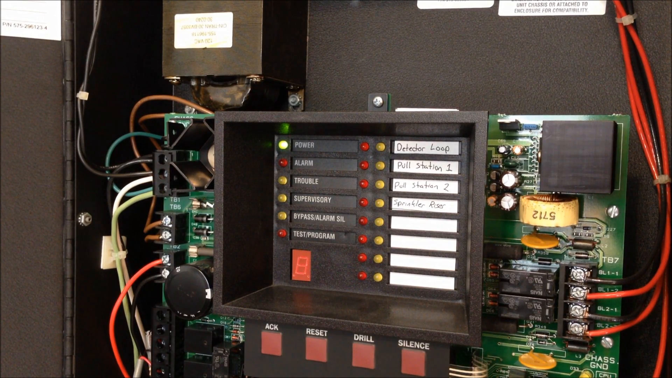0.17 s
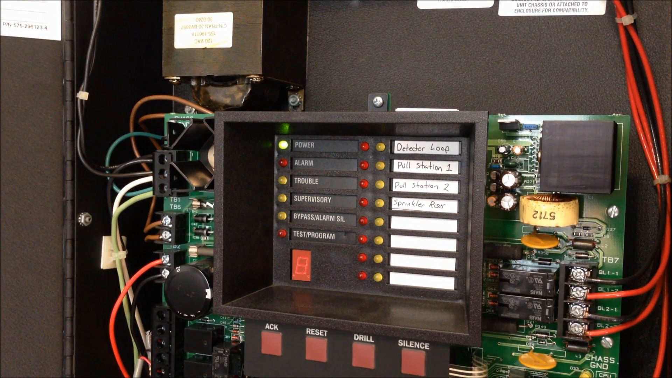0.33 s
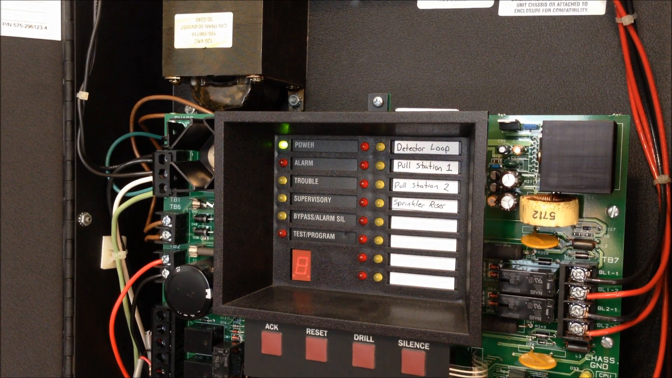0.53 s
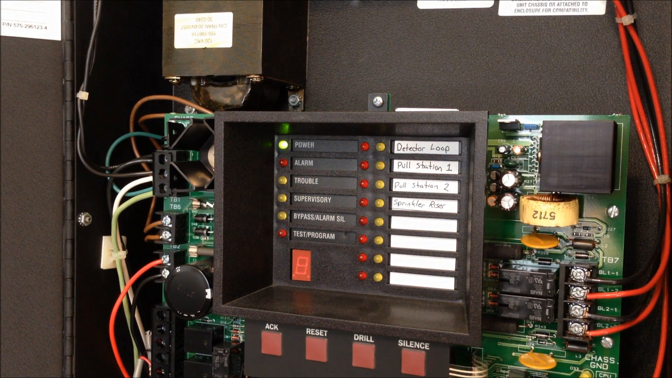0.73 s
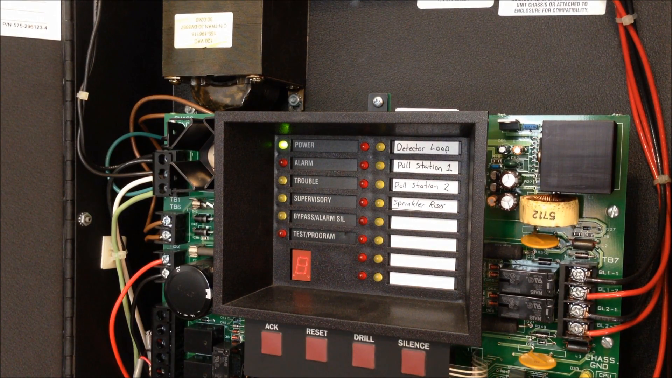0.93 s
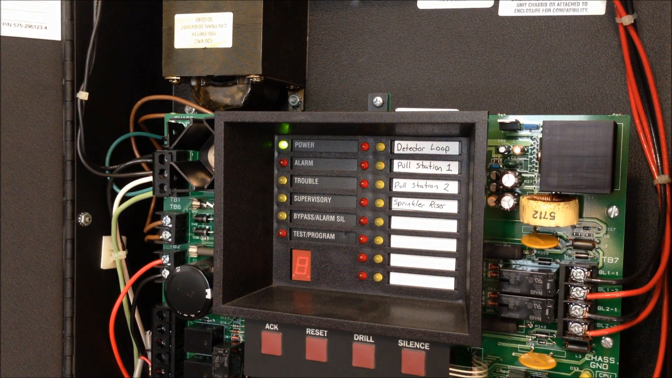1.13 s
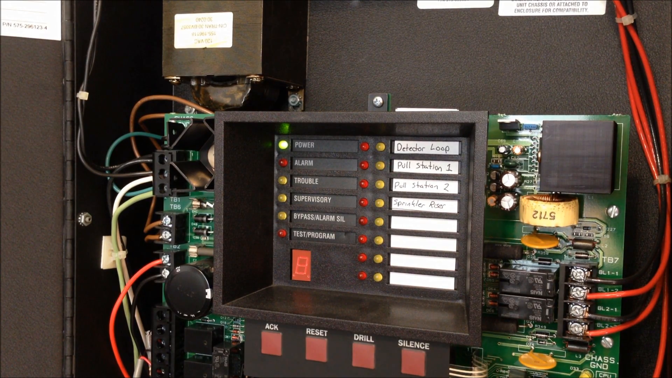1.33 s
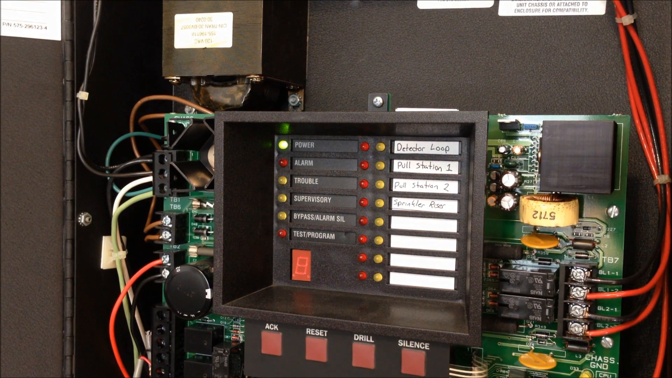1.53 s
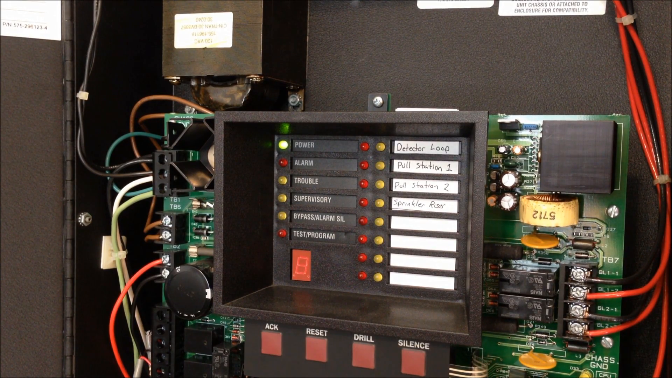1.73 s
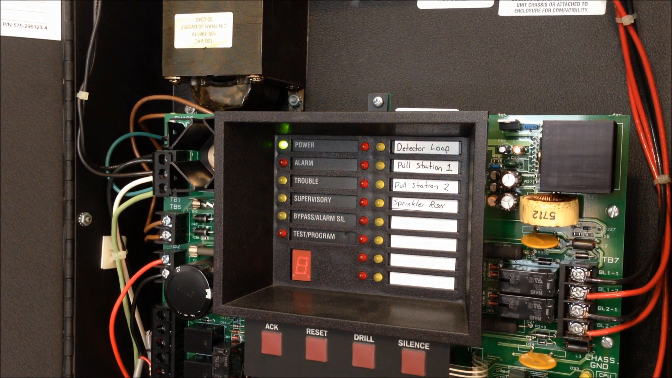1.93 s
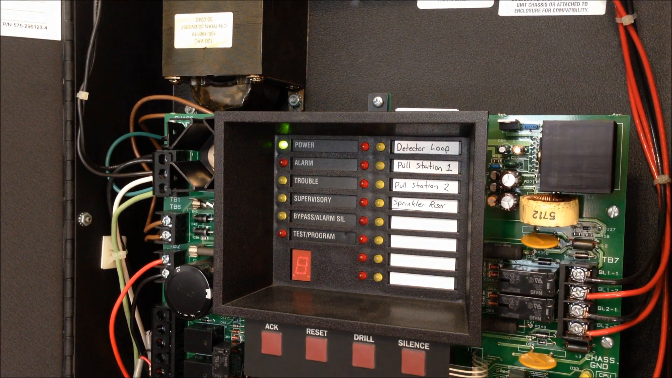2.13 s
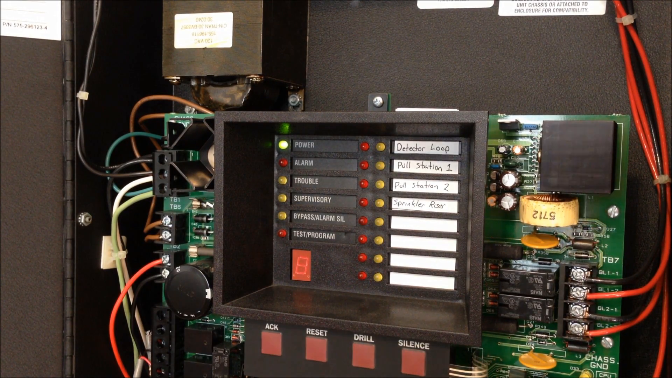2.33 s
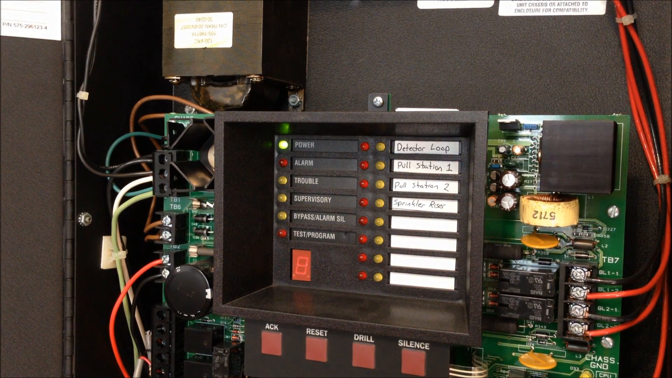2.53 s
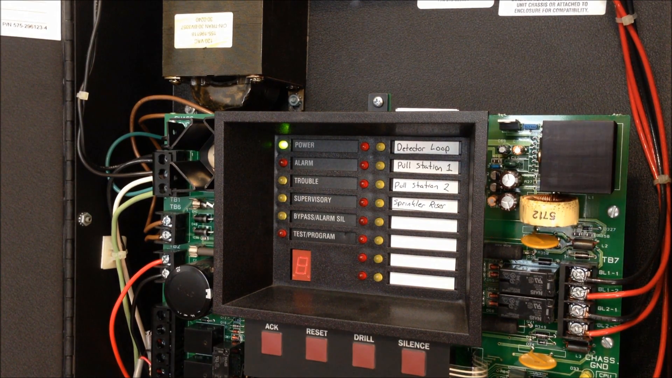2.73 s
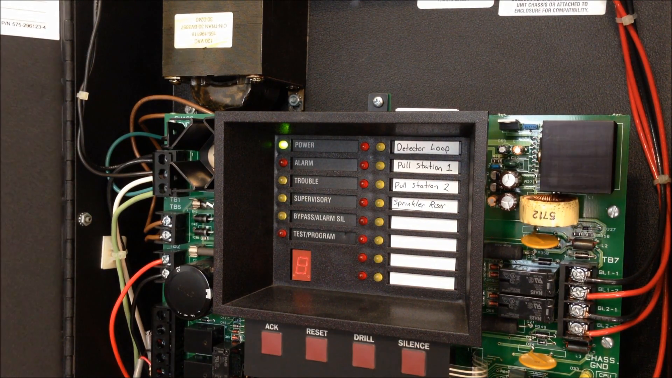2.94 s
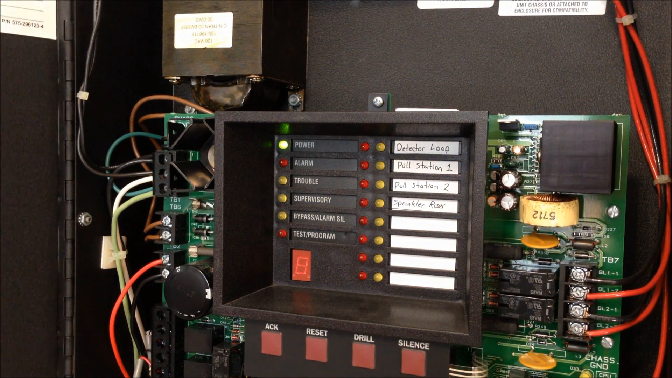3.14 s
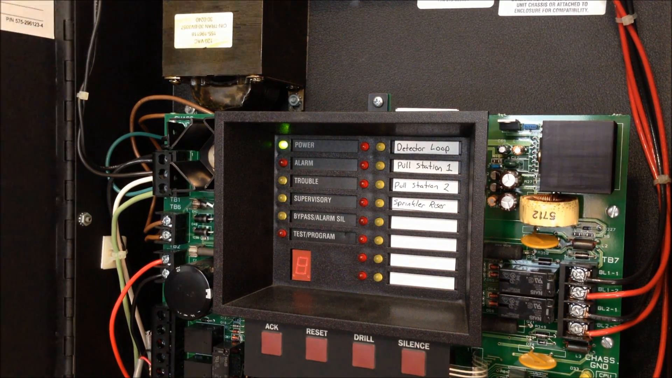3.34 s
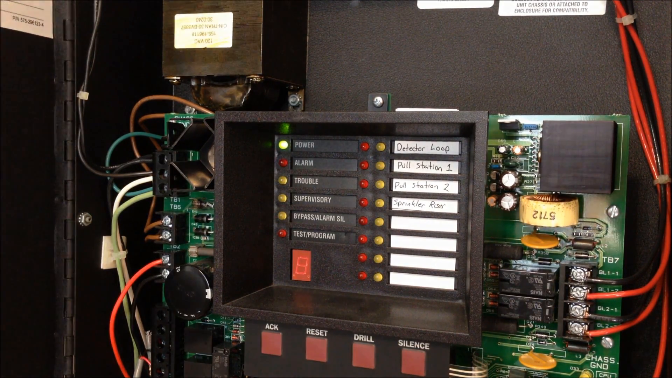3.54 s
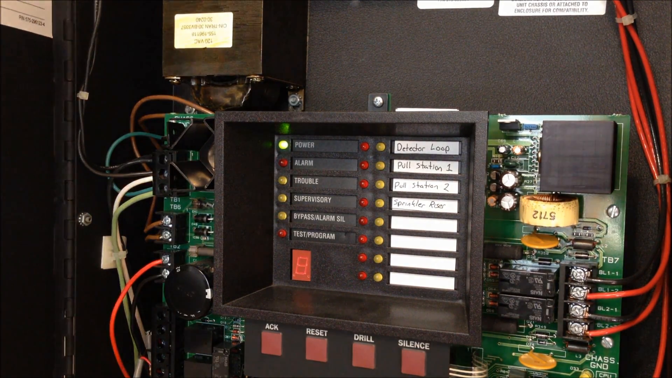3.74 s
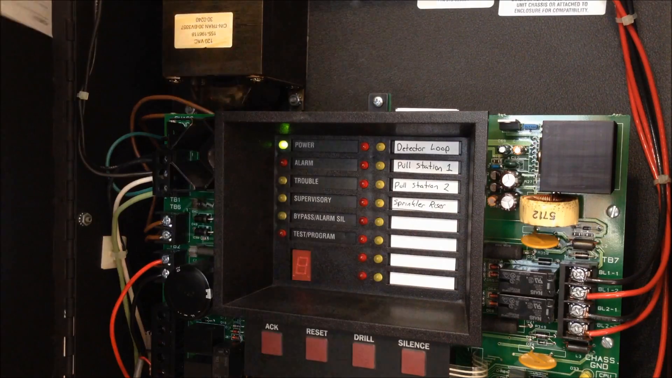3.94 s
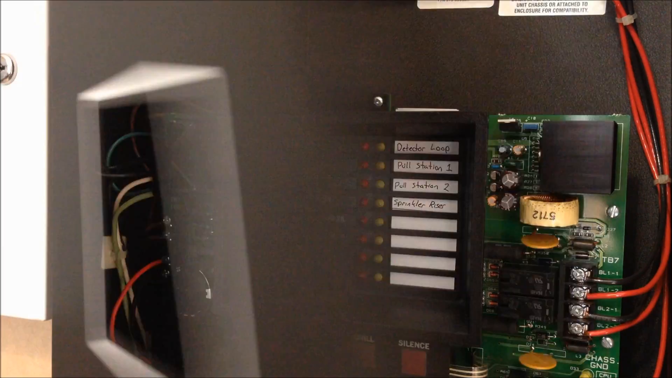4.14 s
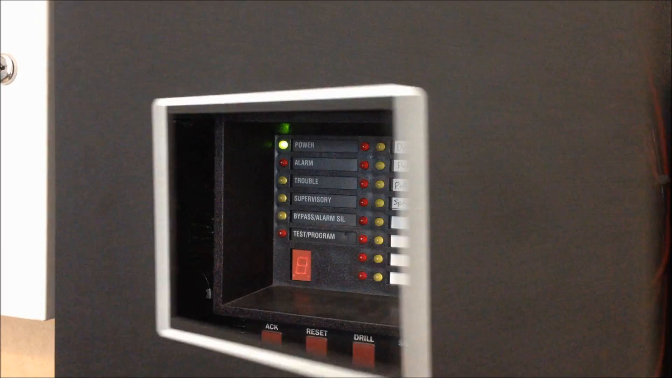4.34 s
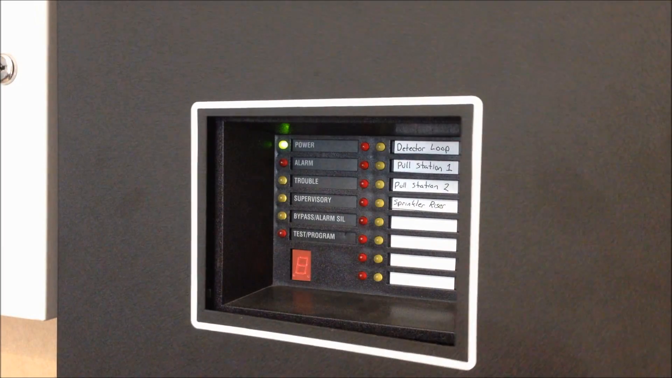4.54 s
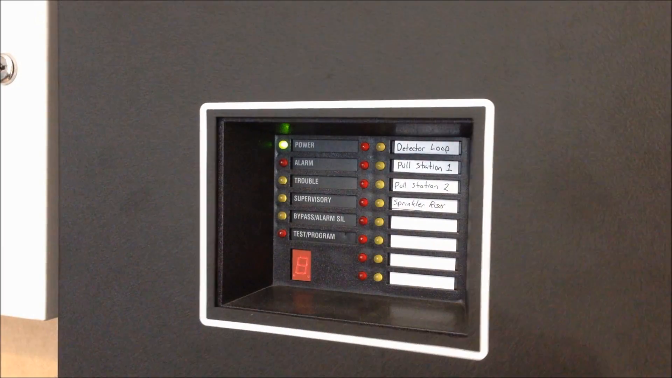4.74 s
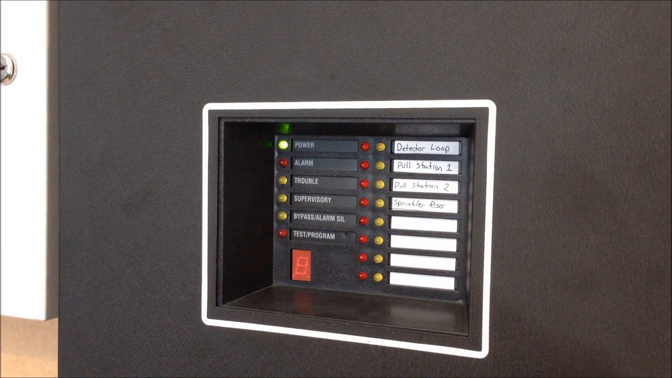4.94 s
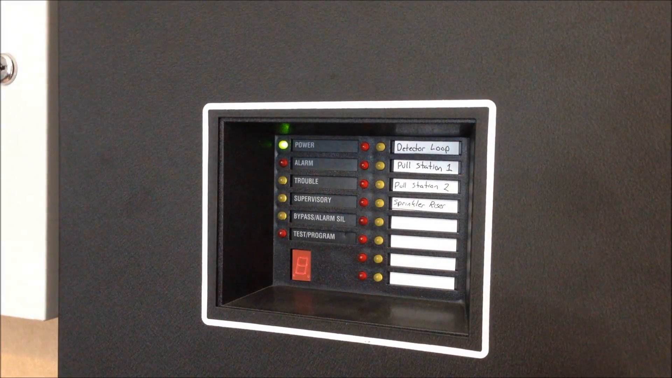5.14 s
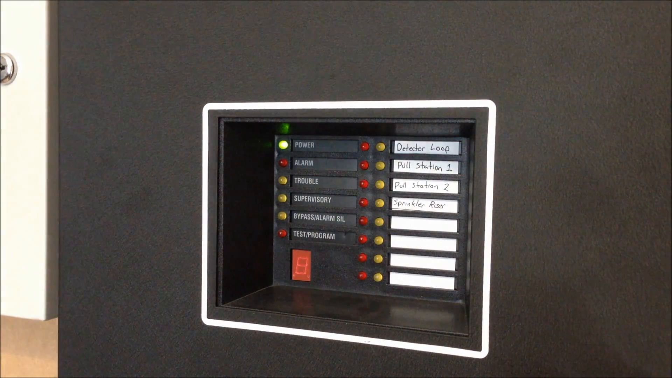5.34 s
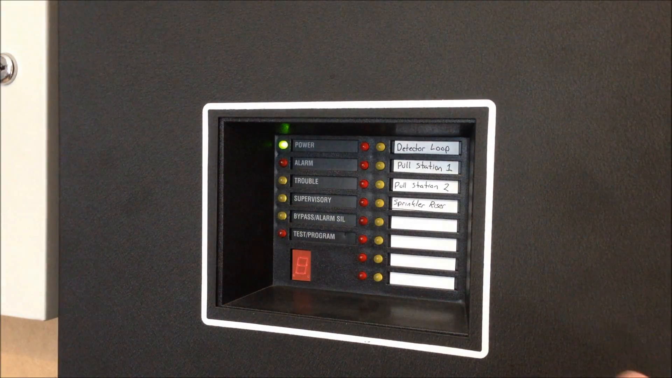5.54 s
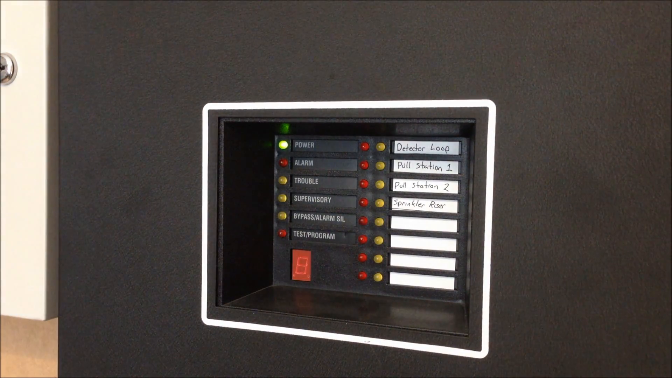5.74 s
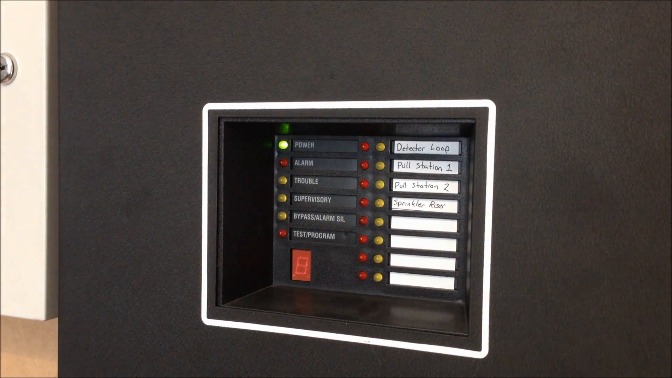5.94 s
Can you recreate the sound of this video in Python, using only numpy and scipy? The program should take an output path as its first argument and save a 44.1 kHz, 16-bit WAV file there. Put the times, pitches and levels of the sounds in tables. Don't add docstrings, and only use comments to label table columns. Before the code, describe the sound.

Close microphone at a steel cabinet in a quiet room with faint hiss and low rumble. Two crisp latch clicks come early, then a long near-silence. The latch snaps again, a finger taps, a hand knocks the panel and small keys jingle faintly. The thin door bangs shut hard with a short boom, then rattles, bounces softly and settles.

```python
import sys
import numpy as np
from scipy import signal
from scipy.io import wavfile

SR = 44100
rng = np.random.default_rng(int(sys.argv[2]) if len(sys.argv) > 2 else 0)


def int16_out(signal):
    q = np.round(np.clip(np.atleast_2d(signal).T, -1, 1) * 32767)
    wavfile.write(sys.argv[1], SR, q.astype(np.int16))


def how_loud(loudness_db):
    steps = np.asarray(loudness_db, float) / 20
    return 10 ** steps


N = 267995

EDGES = np.append(28 * 2 ** np.arange(0, 9.1, 1 / 3), 17000)
CENTRES = np.sqrt(EDGES[1:] * EDGES[:-1])

# pitch_hz, level_db (per Hz)
ROOM_AIR = [(25, -20.5), (50, -8), (90, -5.5), (150, 0.5), (220, -8), (350, -9.5), (450, -16.5), (700, -21),
            (1300, -26.5), (2200, -24.5), (3800, -21), (6000, -22.5), (10000, -23), (15800, -24.5)]
# pitch_hz, level_db
HUM = [(240.4, -80.5), (359, -82), (116, -91.5)]
# nearest_s, level_db, away_s (to move one nearest-distance), pitch_hz
PASSES = [
    (1.805, -60, 0.28, 112.6),
    (2.2, -76.5, .12, 110),
    (1.1, -75.5, .4, 83),
    (3, -70.5, 0.256, 76),
    (5.2, -73.5, 0.58, 80),
]
# centre_s, level_db
THUDS = [(.88, -70), (1.82, -62), (1.96, -65.5), (3.27, -72), (3.63, -62.5), (5.78, -60)]

# start_s, level_db (peak), weight_db, sharpness_db, t60_s
LATCH_CLICK = [(1.1463, -29.5, -15, -22, 0.17)]
LATCH_CATCH = [(1.2147, -25.5, -18, -26, 0.14)]
LATCH_RELEASE = [(3.0348, -27.5, 0, 0, 0.14)]
CREEPS = [
    (3.348, -43, -1, -1, 0.1),
    (3.722, -45.5, 0.5, -22, 0.14),
    (5.09, -49, -8, 3, 0.13),
    (5.102, -42, -12, -3, .1),
]
FINGER_TAP = [
    (3.3997, -46, -18, -5, 0.083),
    (3.4032, -33.5, -26.5, -35, 0.18),
]
RUBS = [
    (3.733, -39.5, 2.5, -31.5, 0.085),
    (4.928, -33.5, 2, -32.5, 0.047),
    (5.101, -32, -9, -25.5, 0.1),
]
HANDLING = [
    (3.7394, -22.5, -10, -11.5, 0.091),
    (3.7644, -39, -11.5, -13, 0.22),
    (4.0134, -55.5, -3.5, -21, 0.3),
    (4.6394, -69.5, 0.5, -26, 0.26),
]
KEY_RATTLE = [(3.8035, -47, -16.5, 6, 0.2), (4.1038, -56, -14.5, -1, 0.22), (4.1435, -56.5, -18, 8, 0.089),
              (4.1571, -61, -13, 10, 0.42), (4.195, -57.5, -22, -19, 0.3), (4.2385, -42.5, -28, 0, 0.25),
              (4.2505, -40.5, -21.5, -20, 0.14), (4.352, -56, -23, -8, 0.11)]
KEY_SWING = [(3.8675, -39.5, -26, -1, 0.15)]
SLAM = [
    (4.9349, -11.5, -12.5, -29.5, 0.069),
    (4.9417, -7.5, -21, -16, 0.17),
    (4.9464, -12.5, -11.5, -17.5, 0.13),
    (4.9754, -16, -14.5, -16.5, 0.21),
]
FRAME_RATTLE = [(5.1067, -31, -7.5, -6.5, 0.11), (5.1134, -28, -16, -14, 0.089),
                (5.1263, -44.5, -7.5, -14, 0.55)]
FRAME_TICK = [(5.2555, -45.5, 0, 0, 0.11)]
REBOUND = [
    (5.2754, -38, -2, -16, 0.081),
    (5.281, -42.5, -1.8, -27, 0.12),
    (5.2966, -50.5, -1.3, -32, 0.21),
]
LOCK_RATTLE = [(5.3852, -51.5, -10.5, -21, 0.39), (5.4301, -72, -8, -2, 0.13),
               (5.4622, -39.5, -17, -13, 0.17)]
SETTLING = [(5.713, -43, -3.5, -33, 0.16), (5.782, -77, 5, -6, 0.11), (5.88, -66, -0.5, -5, 0.11),
            (5.93, -74, -6, -7.5, 0.13)]

# pitch_hz, level_db, t60_s
LATCH_MODES = [(642, -8.5, 0.094), (780, -27, 0.11), (1080, -8, 0.087), (1160, -25, 0.38),
               (1335, -2.5, 0.14), (1695, -4.5, 0.12), (2090, -12, 0.069), (2890, -11, 0.16),
               (3520, 3, 0.04), (3800, -15, 0.039), (4470, -18, .09), (4880, 1, 0.057), (4700, -8, 0.042),
               (5100, 3.5, 0.034), (7600, -16, 0.05), (9140, -18, 0.059), (15800, 8, 0.02)]
CATCH_MODES = [(644, -17, 0.16), (1078, -3.5, 0.13), (1200, -14.5, 0.3), (1330, -2, 0.12),
               (1650, -5.5, 0.12), (2090, 2, 0.054), (2920, -13, 0.035), (3307, 9, 0.023), (3470, 4, 0.025),
               (3940, -14, 0.16), (4130, -15, 0.14), (5100, -14, 0.08), (4570, 0, 0.048), (5320, 8, 0.03),
               (6500, -9, 0.025), (7230, 8, 0.014), (7640, -15, 0.18), (7500, -9, 0.19), (16150, 0, .02)]
RELEASE_MODES = [(654, -10.5, 0.098), (1210, -23, 0.4), (1333, -8.5, 0.06), (1465, -5, 0.13),
                 (1696, -7, 0.092), (2100, -27, .08), (3410, 1.5, 0.044), (3600, -8, 0.085),
                 (4440, -21, 0.079), (4820, 5, 0.043), (5070, 9, 0.03), (5440, 2, 0.044), (13700, -10, .03),
                 (16010, 3, .015)]
TAP_MODES = [(505, -15.5, 0.31), (631, -16.5, 0.42), (1766, 3, 0.049), (2070, 1, 0.05), (2650, -2, 0.04),
             (3180, -6, 0.05), (4160, -6, 0.076), (4400, -6, 0.068), (5230, 6.5, 0.045), (6570, -13, .07)]
PANEL_MODES = [(158.6, -8, 0.2), (360, 3, 0.13), (440, -27, .1), (622, 0, 0.21), (950, -4, 0.19),
               (1142, -8, 0.26), (1560, -0.5, 0.18), (3450, -4.5, 0.054), (4600, 5, 0.027), (5470, -30, .1),
               (6100, -20, 0.091), (6900, -25, 0.053), (7300, 9.5, 0.017), (8400, -1, 0.012)]
KEY_MODES = [(1558, -12.5, 0.055), (4100, -10.5, 0.03), (4570, -8, .03), (5420, -2, 0.035),
             (6275, -3.5, 0.03), (6850, -4.5, .03), (8400, -8, 0.027), (9900, -10, .03), (12500, -16, .025),
             (14800, -10, .025)]
SWING_MODES = [(1620, -28, .06), (4800, -21, .04), (6020, 6, .06), (6250, -6, .05), (8040, 5, .025),
               (7500, -2, .03)]
DOOR_MODES = [(1172, -14.5, 0.2), (1260, -13.5, 0.16), (1430, -19.5, 0.52), (1644, -12, 0.35),
              (1890, -8.5, 0.27), (2250, -14.5, 0.15), (2440, -12.5, 0.18), (2823, -8, .15),
              (3400, -7.5, .12), (3910, -9, .13), (3730, -8, .1), (3524, -10.5, 0.1), (3750, -7.5, 0.13),
              (5235, -4.5, 0.11), (5700, -2.5, 0.082), (6400, -14.5, 0.083), (6450, -15.5, .15)]
FRAME_MODES = [(962, -11.5, 0.13), (6380, -18, .1), (9900, -15, 0.073), (14760, -6, .05)]
LOCK_MODES = [(5400, -18, .08), (6234, -11, 0.13), (7430, -2, 0.08), (8220, -7, 0.076), (9800, -27, .11),
              (11200, -21, .08), (12430, -8, .06), (13640, -17, 0.06), (14380, -5, 0.09),
              (14550, -5, 0.076)]
REBOUND_MODES = [(674, -7, 0.051), (1260, -12, 0.08), (1950, -26, 0.07), (1666, -14, 0.18),
                 (2120, -20, 0.063), (2316, -27, 0.099), (3460, -30, 0.11)]
SETTLING_MODES = [(70.5, -4, 0.26), (200.2, 2.5, 0.14), (315, -12, 0.27), (378, -11.5, 0.78),
                  (460, -5, 0.206), (846, -14, 0.13), (1125, -23.5, .15), (2990, -18, 0.046)]

# pitch_hz, level_db (per Hz)
LATCH_COLOUR = [(180, -42), (300, -35), (446, -28), (631, -14.5), (849, -14), (1090, -2.5), (1670, -9.5),
                (1970, -7), (2610, -16), (4000, -3.5), (11100, -16.5), (13600, -11), (15500, -24)]
RELEASE_COLOUR = [(300, -34), (631, -16.5), (1100, -8), (1600, -3.5), (2100, -9.5), (2700, -31),
                  (3500, -4.5), (5300, -3), (7500, -11), (13600, -11), (15500, -26)]
KEY_COLOUR = [(59, -16.5), (100, -5.5), (640, -1.5), (758, -15.5), (936, -5.5), (1520, -4), (2690, -4),
              (6260, 3), (13700, -12.5), (14500, -16), (15500, -27)]
PANEL_COLOUR = [(60, -22), (150, -3.5), (400, -7), (1000, -1.5), (2500, -2.5), (4500, -2.5), (7500, -2),
                (10000, -9.5), (12000, -24), (15500, -26)]
SWING_COLOUR = [(200, -11), (1000, -10.5), (2500, -10.5), (6000, -1.5), (8500, -3), (12000, -18),
                (15500, -18)]
DOOR_COLOUR = [(30, -41.5), (70, -18), (200, -8), (500, -18.5), (1200, -14), (3000, -17.5), (6300, -17),
               (9000, -29.5), (15500, -43)]
LOCK_COLOUR = [(59, -37.5), (100, -6.5), (362, -9.5), (808, -15.5), (936, -12), (1880, -17), (2090, -18),
               (6000, -11.5), (15500, -13)]
TICK_COLOUR = [(300, -18), (1500, -15), (4000, -13), (9000, -16), (12000, -20), (15000, -10)]

# pitch_hz, factor
RING_LENGTH = [(60, 2.8), (250, 1.9), (1200, 1.24), (4500, 0.95), (12000, 0.74)]
# start_s, pitch_hz, level_db, t60_s
BOOM_MODES = [(4.927, 151, -34, 0.14), (4.934, 438.5, -20.5, 0.13), (4.938, 196, -15.5, 0.066),
              (4.945, 208.1, -21, 0.25), (4.942, 636, -21, 0.067), (4.94, 298, -22.5, 0.17),
              (4.94, 128, -40.5, .15), (4.94, 54.6, -36, .3), (4.942, 823, -24, 0.1),
              (4.942, 913, -32.5, 0.24), (4.975, 390.7, -31.5, 0.23), (4.985, 460, -32, 0.22),
              (5.003, 224.3, -32, 0.31), (5.005, 111.5, -30.5, 0.16), (5.045, 244.5, -37.5, 0.44),
              (5.061, 149, -40, 0.39), (5.1, 343, -39.5, 0.216), (5.105, 567, -48, 0.17),
              (5.115, 680, -48, 0.17), (5.263, 196.7, -38, 0.26), (5.275, 374, -36.5, 0.07),
              (5.28, 450, -45.5, 0.12), (5.285, 136, -41.5, 0.19), (5.29, 218, -35, 0.071),
              (5.286, 1668, -46, 0.12), (5.3, 1680, -60, 0.22)]


def rms_one(x):
    return x / np.sqrt(np.mean(x ** 2) + 1e-20)


def at_hz(points, hz):
    table_hz, values = np.array(points).T
    return np.interp(np.log(hz), np.log(table_hz), values)


def band_filter(x, order, hz, kind):
    return signal.sosfilt(signal.butter(order, hz, kind, fs=SR, output="sos"), x)


def noise_bands():
    white = rng.standard_normal((2, N))
    pairs = zip(EDGES, EDGES[1:])
    return np.array([band_filter(white[k % 2], 2, [low, high], "band") for k, (low, high) in enumerate(pairs)])


def wander(per_s, heard=slice(None)):
    steps = rng.standard_normal(int(N / SR * 100) + 9)
    place = np.arange(N)[heard] / SR * min(per_s, 100)
    return np.interp(place, np.arange(len(steps)), steps)


def room_air():
    return how_loud(-68) * rms_one(how_loud(at_hz(ROOM_AIR, CENTRES)) @ noise_bands())


def transformer_hum():
    t = np.arange(N) / SR
    return sum(np.sqrt(2) * how_loud(level_db) * np.sin(2 * np.pi * hz * t) for hz, level_db in HUM)


def traffic():
    loss_db = 33.5
    thud_s = 0.016
    t, notes = np.arange(N) / SR, 0
    rumble_gain = how_loud(-77.5 - 1.5 * wander(6.0))
    for nearest_s, level_db, away_s, hz in PASSES:
        side = np.where(t < nearest_s, 0.85, 1)
        distance = np.hypot(1, (t - nearest_s) / away_s * side)
        gain = how_loud(level_db - loss_db * np.log10(distance))
        pitch_hz = hz + 1.5 * wander(3.2)
        note = np.sqrt(2) * np.sin(2 * np.pi * np.cumsum(pitch_hz) / SR)
        notes = notes + gain * note * how_loud(2.1 * wander(17))
        rumble_gain = rumble_gain + how_loud(-13) * gain
    for centre_s, level_db in THUDS:
        rumble_gain = rumble_gain + how_loud(level_db) * np.exp(-((t - centre_s) / thud_s) ** 2)
    rumble = rms_one(band_filter(rng.standard_normal(N), 2, [40, 100], "band"))
    return notes + rumble_gain * rumble


def gritty(bands, grit_db):
    steps = rng.standard_normal(N // 40 + 2)
    flicker = np.interp(np.arange(N) / 40, np.arange(len(steps)), steps)
    share = np.clip(np.log2(CENTRES / 500) / 2, 0, 1)[:, None]
    return bands * how_loud(grit_db * share * flicker)


def ring(force, hz, t60):
    r = how_loud(-60 / (max(t60, .01) * SR))
    w = 2 * np.pi * hz / SR
    return signal.lfilter([0, np.sin(w)], [1, -2 * r * np.cos(w), r * r], force + 1e-18)


def tilt_db(contact, hz):
    _, _, weight_db, sharpness_db, _ = contact
    return at_hz([(250, 2.5 * weight_db), (1200, weight_db), (4500, 0), (11000, sharpness_db)], hz)


def chatter_pushes(modes_hz, count, chatter_s):
    t = np.arange(2000) / SR
    fading = np.exp(-t / max(chatter_s, 1e-4))
    chatters = rng.standard_normal((count, len(modes_hz), len(t))) * fading / np.sqrt(np.sum(fading ** 2))
    turning = np.exp(-2j * np.pi * modes_hz[:, None] * t)
    net = np.abs(np.einsum('cmt,mt->cm', chatters, turning))
    return chatters / np.maximum(net, .4)[:, :, None]


def struck(contacts, colour, modes, bands, dense_db, clear_db, rise_s, crack_db, chatter_s):
    out, t = np.zeros(N), np.arange(SR // 2) / SR
    usual = np.mean(np.array(contacts), axis=0)
    modes_hz, modes_db, _ = np.array(modes).T
    chatters = chatter_pushes(modes_hz, len(contacts), chatter_s)
    forces = np.zeros((len(modes), N))
    for contact, chatter in zip(contacts, chatters):
        start_s, peak_db, _, _, contact_t60 = contact
        at = round(start_s * SR - rise_s * SR)
        span = t[:N - at]
        here = slice(at, at + len(span))
        tilt = tilt_db(contact, CENTRES) - tilt_db(usual, CENTRES)
        level = peak_db + dense_db + at_hz(colour, CENTRES) + tilt
        t60 = np.maximum(contact_t60, .02) * at_hz(RING_LENGTH, CENTRES)[:, None]
        onset = 1 - np.exp(-(span / (rise_s + 1.3 / CENTRES[:, None])) ** 2)
        decay = how_loud(-60 * span / t60) + how_loud(crack_db - 60 * span / 0.031)
        out[here] += np.sum(how_loud(level)[:, None] * onset * decay * bands[:, here], axis=0)
        tilt = tilt_db(contact, modes_hz) - tilt_db(usual, modes_hz)
        strength = peak_db + clear_db + modes_db + tilt
        forces[:, at:at + chatter.shape[1]] += how_loud(strength)[:, None] * chatter
    heard = slice(round(contacts[0][0] * SR) - SR // 20, round(contacts[-1][0] * SR) + SR // 2)
    for force, (hz, _, t60) in zip(forces, modes):
        beating = 1 + min(hz / 2500, 1) * wander(60, heard) / 2.0
        out[heard] += ring(force[heard], hz, t60) * beating
    return out


def latch(bands):
    clicks = struck(LATCH_CLICK, LATCH_COLOUR, LATCH_MODES, bands, dense_db=-3.0, clear_db=-12.0,
                    rise_s=0.000678, crack_db=12.5, chatter_s=0.0011)
    clicks += struck(LATCH_CATCH, LATCH_COLOUR, CATCH_MODES, bands, dense_db=-2.0, clear_db=-14.0,
                     rise_s=0.0007, crack_db=6.0, chatter_s=0.00072)
    clicks += struck(LATCH_RELEASE, RELEASE_COLOUR, RELEASE_MODES, bands, dense_db=-4.0, clear_db=-14.5,
                     rise_s=0.000915, crack_db=4.0, chatter_s=0.0051)
    return band_filter(clicks + 1e-18, 4, 540, "high")


def sliding(bands):
    rubs = struck(RUBS, KEY_COLOUR, KEY_MODES, bands, dense_db=-3, clear_db=-60,
                  rise_s=.011, crack_db=-30, chatter_s=.01)
    creeps = struck(CREEPS, KEY_COLOUR, KEY_MODES, bands, dense_db=-3, clear_db=-60,
                    rise_s=.02, crack_db=-30, chatter_s=.01)
    return rubs + creeps


def hand(bands):
    tap = struck(FINGER_TAP, KEY_COLOUR, TAP_MODES, bands, dense_db=-9.0, clear_db=-14.5,
                 rise_s=0.00102, crack_db=0.5, chatter_s=0.006)
    shake = struck(HANDLING, PANEL_COLOUR, PANEL_MODES, bands, dense_db=-1.5, clear_db=-16.0,
                   rise_s=0.001056, crack_db=-25, chatter_s=0.0092)
    return tap + shake


def key_rattle(bands):
    return struck(KEY_RATTLE, KEY_COLOUR, KEY_MODES, bands, dense_db=-7, clear_db=-5.5,
                  rise_s=0.0011, crack_db=-16, chatter_s=0.012)


def key_swing(bands):
    return struck(KEY_SWING, SWING_COLOUR, SWING_MODES, bands, dense_db=-3.5, clear_db=-11.0,
                  rise_s=0.004, crack_db=-23, chatter_s=0.0069)


def boom():
    out, t = np.zeros(N), np.arange(SR // 2) / SR
    swell = 1 - np.exp(-(t / 0.0036) ** 2)
    for start_s, hz, level_db, t60 in BOOM_MODES:
        at = round(start_s * SR)
        decay = how_loud(level_db - 60 * t / max(t60, .02))
        out[at:at + len(t)] += swell * decay * np.sin(2 * np.pi * hz * t)
    return out


def slam(bands):
    return struck(SLAM, DOOR_COLOUR, DOOR_MODES, bands, dense_db=7.0, clear_db=-18.5,
                  rise_s=.0005, crack_db=0.5, chatter_s=0.0067)


def frame_rattle(bands):
    return struck(FRAME_RATTLE, LOCK_COLOUR, FRAME_MODES, bands, dense_db=4.5, clear_db=-10.0,
                  rise_s=0.0017, crack_db=-9.0, chatter_s=0.013)


def frame_tick(bands):
    return struck(FRAME_TICK, TICK_COLOUR, LOCK_MODES, bands, dense_db=5.5, clear_db=-23,
                  rise_s=0.00105, crack_db=-3, chatter_s=0.003)


def rebound(bands):
    return struck(REBOUND, DOOR_COLOUR, REBOUND_MODES, bands, dense_db=14, clear_db=-1.0,
                  rise_s=0.00181, crack_db=-8, chatter_s=0.023)


def lock_rattle(bands):
    return struck(LOCK_RATTLE, LOCK_COLOUR, LOCK_MODES, bands, dense_db=3.5, clear_db=-8.0,
                  rise_s=0.001014, crack_db=-2.0, chatter_s=0.0029)


def settling(bands):
    return struck(SETTLING, DOOR_COLOUR, SETTLING_MODES, bands, dense_db=12.5, clear_db=-4.5,
                  rise_s=0.001066, crack_db=-18.0, chatter_s=0.013)


def room(x):
    t = np.arange(SR // 2) / SR
    tail = rng.standard_normal(len(t)) * how_loud(-60 * t / 0.33) * (t > .006)
    tail = signal.lfilter([.5], [1, -.5], tail)
    return how_loud(-25) * signal.fftconvolve(x, tail / np.sqrt(np.sum(tail ** 2)))[:N]


def scene():
    bands = gritty(noise_bands(), grit_db=0.9)
    door = latch(bands) + key_swing(bands) + frame_tick(bands)
    door += hand(bands)
    door += key_rattle(bands)
    door += slam(bands) + rebound(bands) + settling(bands)
    door += frame_rattle(bands) + lock_rattle(bands)
    door += sliding(bands) + boom()
    in_room = door + room(door)
    background = room_air() + transformer_hum() + traffic()
    return (in_room + background)[None]


def top_cut(x):
    return signal.sosfilt(signal.butter(12, 16590, fs=SR, output="sos"), x)


def record(dry):
    thin = band_filter(dry, 2, 42, "high")
    mix = signal.sosfilt(signal.ellip(8, .3, 24, 15450, fs=SR, output="sos"), thin)
    return top_cut(mix)


dry = scene()
out = record(dry)
int16_out(out)
```